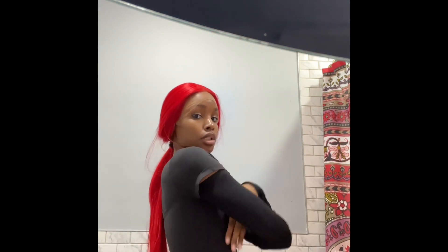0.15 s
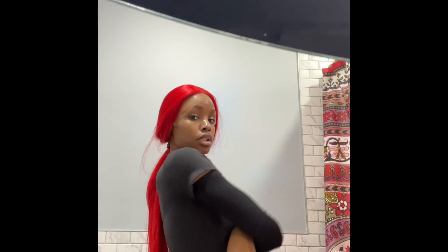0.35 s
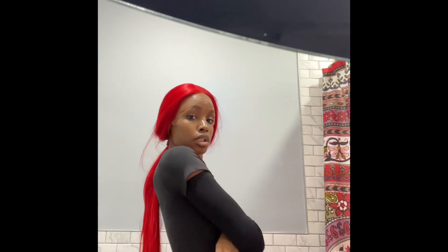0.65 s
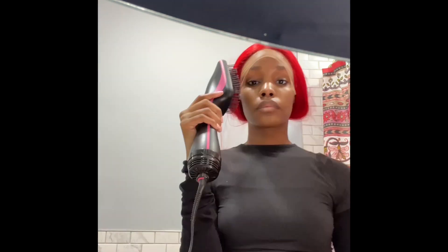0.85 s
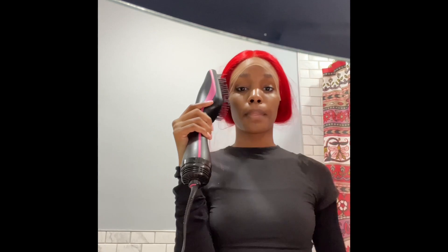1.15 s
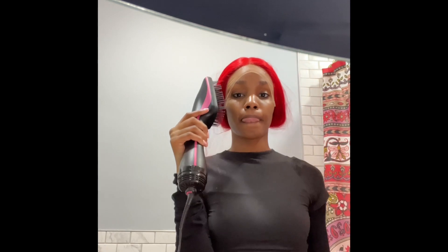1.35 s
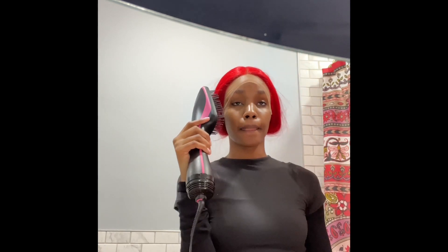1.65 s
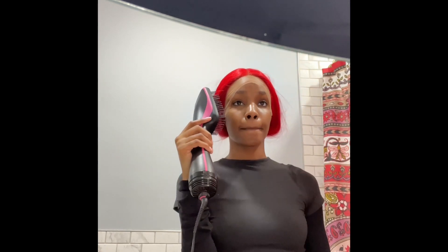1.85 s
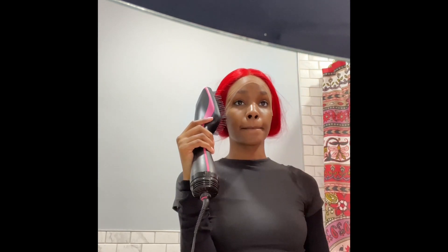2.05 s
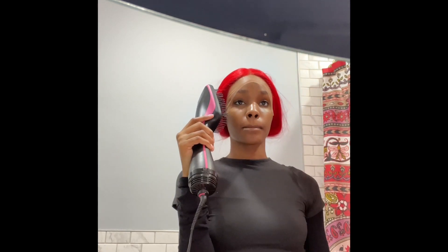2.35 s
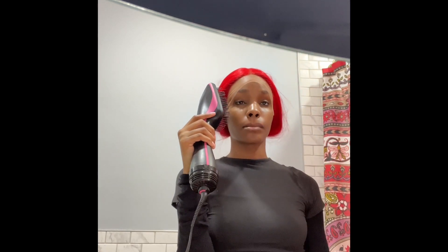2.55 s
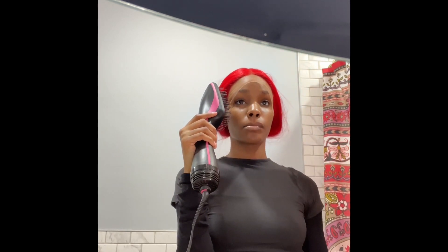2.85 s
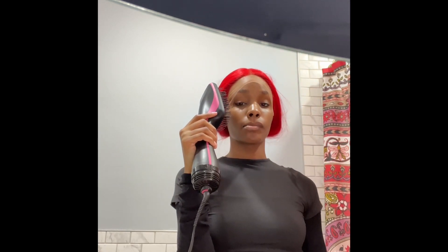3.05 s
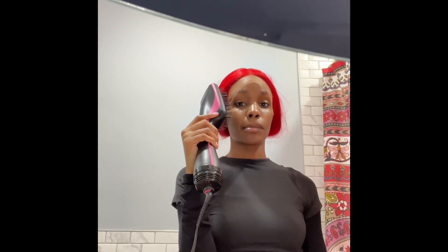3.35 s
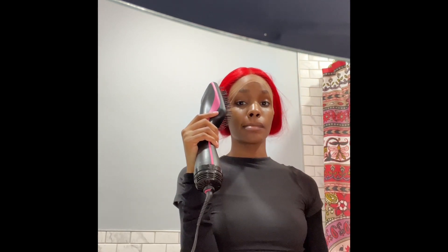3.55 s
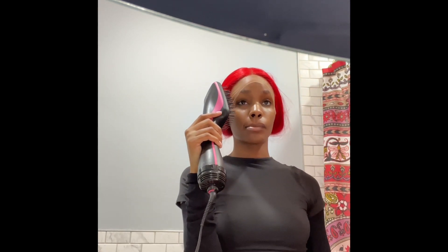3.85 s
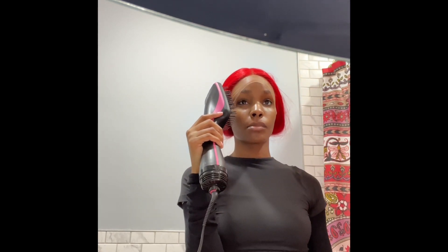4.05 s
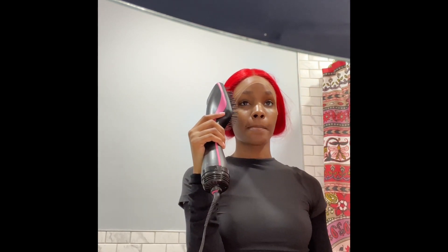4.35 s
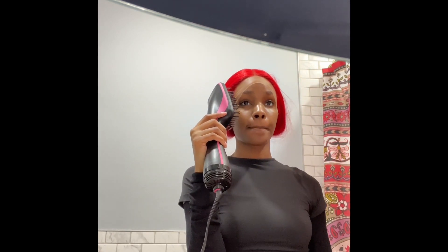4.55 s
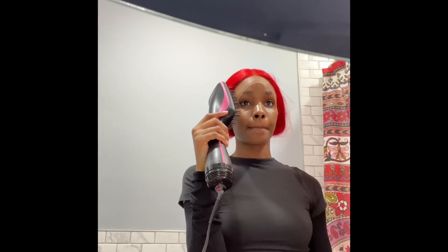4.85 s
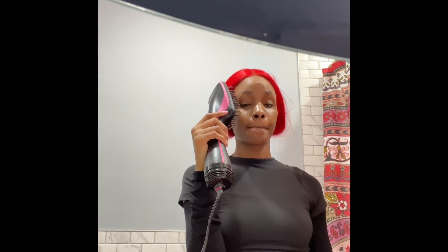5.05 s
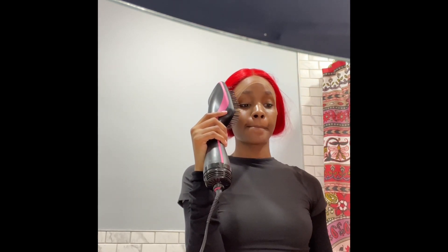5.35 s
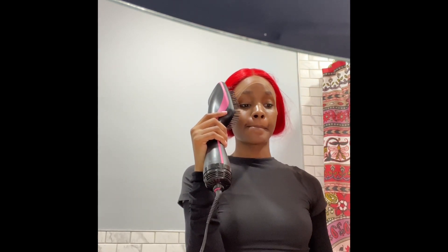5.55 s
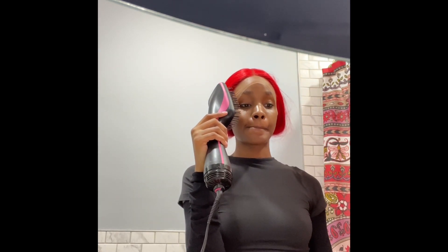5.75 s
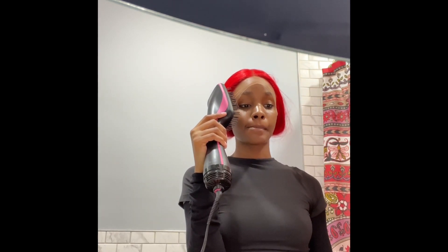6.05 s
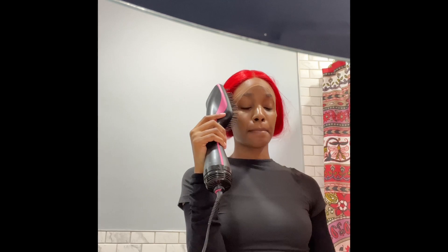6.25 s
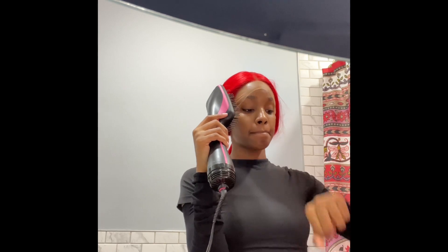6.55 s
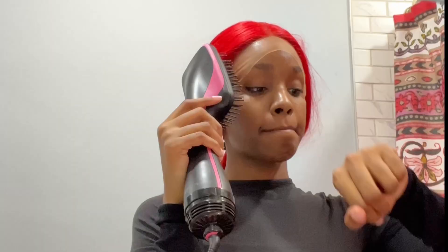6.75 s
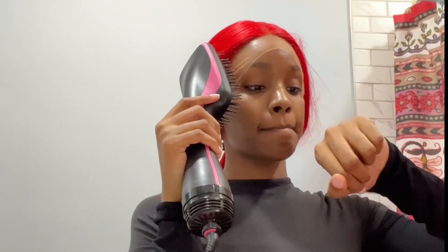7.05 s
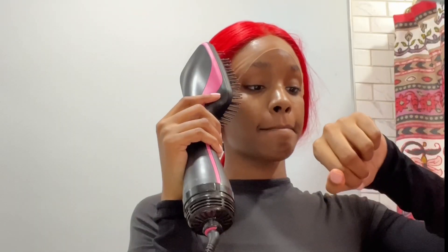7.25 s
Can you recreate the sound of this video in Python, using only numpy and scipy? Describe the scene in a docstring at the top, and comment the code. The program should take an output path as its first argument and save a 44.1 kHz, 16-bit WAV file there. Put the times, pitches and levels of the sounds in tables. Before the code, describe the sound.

Faint cloth and hair rustling in a quiet bathroom cuts abruptly to a hot air brush blowing steadily with a thin, wavering whine.

```python
"""Hot air brush on a wig

In a small tiled bathroom a sleeve and long hair rustle; a short crossfaded cut leads to the running hot air brush.
Rustles are swells of shaped noise; the air is noise shaped by resonances of brush and room, which flare up briefly.
Shaft-locked sines make the fan's hum and whine, which change as the brush is moved near two microphone ports."""
import sys
import numpy as np
from scipy import signal
from scipy.fft import rfft, irfft
from scipy.io import wavfile

SR = 44100
rng = np.random.default_rng(int(sys.argv[2]) if len(sys.argv) > 2 else 0)


def to_wav(sig):
    """Store sig (one row per channel, or 1-D mono) as 16-bit WAV at the path in sys.argv[1].

    Samples outside -1..1 are clipped; the rate is SR.
    """
    pcm = np.clip(np.atleast_2d(sig), -1, 1) * 32767
    pcm = np.round(pcm).astype(np.int16)
    wavfile.write(sys.argv[1], SR, pcm.T)  # frames by channels


N = 326781
TIME = np.arange(N) / SR


def gain_of(db):
    """Decibels to amplitude."""
    return 10 ** (np.asarray(db) / 20)


def read(points, hz):
    """A table of (frequency [Hz], value), joined on a log-frequency axis."""
    f, value = np.transpose(points)
    return np.interp(np.log(hz + 1), np.log(f + 1), value)


def follow(points, t):
    """A table of (time [s], value), joined by straight lines."""
    return np.interp(t, *np.transpose(points))


def bumps(rows, hz):
    """Sum of Gaussian peaks and dips in dB; half widths are to 1/e."""
    return sum(db * np.exp(-((hz - centre) / half) ** 2) for centre, half, db in rows)


def drift(shape, *spans):
    """Smooth chance of unit spread; each span is its grain, in cells, along one axis."""
    field = rng.standard_normal(shape)
    for axis, span in enumerate(spans):
        smooth = np.exp(-2 * (np.fft.rfftfreq(shape[axis]) * span) ** 2)
        spectrum = rfft(field.swapaxes(axis, -1)) * smooth
        field = irfft(spectrum, shape[axis]).swapaxes(axis, -1)
    return field / field.std()


def ports(hz):
    """Complex gain of the left and right port, of unit mean power."""
    # (frequency [Hz], phase by which left leads right [rad])
    lead = [(350, 0), (520, .4), (750, -.4), (1030, -.1), (1200, .3), (1300, -.2), (2450, -.15),
            (2570, -.6), (2750, -.35), (2850, .2), (3050, -.3), (3170, .45), (3500, 0), (6200, 0),
            (6350, .55), (6900, .6), (7700, 1.05), (9200, 1.7), (10750, 2.3), (11050, 2.8), (11700, np.pi)]
    # (frequency [Hz], left minus right level [dB])
    balance = [(200, -.5), (420, 0), (515, 6.5), (600, 0), (900, 0), (1030, -5), (1130, 0), (1330, 2.3),
               (1700, 3), (1900, .8), (2250, 1.4), (2550, 0), (3050, 0), (3230, -2), (3500, 0), (5000, 0),
               (6500, -.5), (9000, 0)]
    half = gain_of(read(balance, hz) / 2) * np.exp(1j * read(lead, hz) / 2)
    mean_power = (abs(half) ** 2 + abs(half) ** -2) / 2
    return np.array([half, 1 / half]) / np.sqrt(mean_power)


def noise(field_db, size):
    """Partly correlated noise at both ports whose dB per Hz follow field_db(hz column, times)."""
    # correlation of the ports: (frequency [Hz], likeness [0-1])
    likeness = [(120, .998), (300, .965), (430, .97), (520, .82), (650, .92), (740, .52), (870, .9),
                (1080, .15), (1250, .72), (1540, .88), (1700, .5), (1850, .9), (2450, .92), (2570, .62),
                (3420, .64), (3500, .99), (3750, .998), (3850, 1), (4130, 1), (4250, .996), (5050, .995),
                (5300, .96), (5550, .985), (5750, .91), (6200, .95), (6350, .73), (6900, .65), (10800, .67),
                (11050, .94), (11700, 1)]
    frames = dict(nperseg=size, noverlap=size - size // 4)
    white = rng.standard_normal((2, N)) * np.sqrt(SR / 2)  # 0 dB per Hz
    hz, t, z = signal.stft(white, SR, **frames)
    hz = hz[:, None]
    same = np.clip(read(likeness, hz), 0, 1)
    shared = np.sqrt((1 + same) / 2) * z[0]
    apart = np.sqrt((1 - same) / 2) * z[1]
    z = np.array([shared + apart, shared - apart]) * ports(hz) * gain_of(field_db(hz, t))
    return signal.istft(z, SR, **frames)[1][:, :N]


def quiet_db(hz, t, grain_db=1.0):
    """Room air plus soft, uneven swells of cloth and hair sliding."""
    # room air: (frequency [Hz], level [dB per Hz])
    room_air = [(25, -99), (60, -91), (140, -87.5), (300, -98.5), (620, -111), (1050, -106), (1500, -106.5),
                (2200, -105), (4000, -112.5), (10000, -124), (15000, -129)]
    # movements of arm, sleeve and hair, before colour and grain:
    # (time [s], half length to 1/e [s], centre [Hz], spread to 1/e [octaves], peak level [dB per Hz])
    rustles = [(.0, 0.03, 1800, 1.1, -96), (.12, .045, 2300, .4, -96), (.15, .07, 5000, .9, -102.5),
               (0.248, 0.052, 5500, 1.1, -99), (.25, .02, 1800, .6, -102), (.325, .02, 1400, 0.73, -101),
               (.39, 0.016, 2600, 1.1, -106), (.485, 0.031, 1250, 0.72, -95.5),
               (0.495, .022, 220, 0.81, -86), (0.503, 0.025, 60, 1.3, -79), (0.517, 0.04, 4500, 0.9, -110),
               (.665, 0.06, 2380, 0.35, -100.5), (.7, .06, 130, .6, -84), (.762, .014, 2250, 0.35, -95)]
    # colour the small room gives the rustling: (centre [Hz], half width [Hz], level [dB])
    rustle_colour = [(1020, 50, 4), (1250, 60, -4), (1500, 45, 4.5), (1740, 90, -3.5), (2120, 70, 4),
                     (2350, 45, 4), (2450, 40, -8), (2600, 45, 2.5), (3150, 45, 3)]
    rubbing = 0
    for s, length, centre, spread, db in rustles:
        in_time = ((t - s) / length) ** 2
        in_pitch = (np.log2((hz + 1) / centre) / spread) ** 2
        rubbing = rubbing + gain_of(db) ** 2 * np.exp(-in_time - in_pitch)
    catching = gain_of(grain_db * drift(rubbing.shape, 8, 1.5)) ** 2  # fibres catch and slip
    rustling = gain_of(bumps(rustle_colour, hz)) ** 2 * rubbing * catching / catching.mean()
    return 10 * np.log10(gain_of(read(room_air, hz)) ** 2 + rustling)


def bathroom():
    """The quiet room: shaped noise of air and rustling, plus a faint hum of steady sines."""
    # (frequency [Hz], RMS level [dB])
    room_hum = [(134, -81), (268, -81), (378, -79)]
    hum = np.zeros(N)
    for hz, db in room_hum:
        hum += np.sqrt(2) * gain_of(db) * np.sin(2 * np.pi * (hz * TIME + rng.random()))
    return noise(quiet_db, size=1024) + hum


def air_db(hz, t, ripple_db=1.0, shifting_db=2.0, swirl_waver_db=0.12, eddy_db=0.36):
    """Turbulence through resonances that trade strength as the brush tilts, rippled by tile reflections."""
    # levels here are before the trim in air()
    # broad rush of air: (frequency [Hz], level [dB per Hz])
    rush = [(25, -114), (55, -91), (330, -99), (450, -78.5), (740, -72.5), (1700, -65.5), (2100, -62.5),
            (2950, -68.5), (4200, -64.5), (5100, -70.5), (6300, -68.5), (7200, -68.5), (11000, -71),
            (13200, -80), (15700, -83)]
    # low resonances of the small room: (centre [Hz], width at -6 dB [Hz], level [dB per Hz])
    room_modes = [(118, 12, -71.5), (140, 12, -80.5), (177, 13, -75), (203, 19, -76), (234.3, 11.1, -69.5),
                  (274, 51, -75), (348, 27, -71.5), (415.3, 64, -66), (460, 11, -67)]
    # resonances of barrel and brush head, sharpened by the tiles:
    # (centre [Hz], width at -6 dB [Hz], level upright [dB per Hz], level tilted [dB per Hz])
    brush_modes = [(585, 118, -64.5, -64.5), (630.5, 13.8, -55.5, -56), (684, 30, -60.5, -62),
                   (796, 17, -58.5, -64.5), (833, 23, -58.5, -59.5), (869, 23, -59.5, -58),
                   (952, 16, -63, -68), (1000, 23, -61.5, -59.5), (1031, 22, -57, -59),
                   (1118, 40, -68, -66), (1324, 38, -64, -61.5), (1445, 74.4, -65, -63.5),
                   (1190, 18, -59.5, -61), (1240, 18, -66, -62.5), (1522, 14, -59, -64),
                   (1570, 90, -66, -65), (1655, 50, -67, -63.5), (1784, 99, -60, -68),
                   (1910, 28, -55.5, -63), (1944, 22, -56, -56), (2000, 22, -57, -58),
                   (2048, 29, -57.5, -55), (2085, 18, -64, -55), (2107, 18, -60, -51.5),
                   (2155, 24, -62, -60.5), (2231, 22, -57, -53), (2268, 26, -57, -54), (2320, 34, -53, -55),
                   (2362, 24, -60, -56), (2405, 36, -57.5, -60), (2489, 44, -53.5, -52.5),
                   (2568, 41, -54.5, -59), (2640, 52, -60, -60), (2726, 58, -54.5, -54),
                   (2778, 32, -56.5, -56), (2820, 30, -61, -64), (2858, 24, -61, -57),
                   (2893, 30, -57.5, -56), (3047, 36, -57.5, -62), (3177, 40, -58, -56.5),
                   (3285, 80, -63, -63.5), (3348, 46, -55.5, -57), (3506, 43, -65.5, -68),
                   (4120, 90, -68, -68), (4437, 95, -63.5, -61.5), (4630, 390, -68, -67.5),
                   (5480, 190, -65.5, -65.5), (5630, 130, -67.5, -69.5), (6020, 160, -70, -70),
                   (6740, 150, -70, -69)]
    # the brush tilts as it settles into the hair: (time [s], tilt [0-1])
    tilting = [(0.8, 0.2), (3.6, 0.2), (4.4, 0.45), (5.2, 0.85), (7.4, 1)]
    # narrow peaks and dips from tile reflections: (centre [Hz], half width [Hz], level [dB])
    reflections = [(784, 14, 1), (920, 12, -4.5), (1725, 20, -1.5), (2466, 15, -4), (2950, 22, 4),
                   (3410, 16, -2), (3680, 80, -1), (5770, 90, -4), (7000, 90, -4)]
    # colour of the vents before hair covers them: (centre [Hz], half width [Hz], level [dB])
    open_vents = [(645, 20, -4), (1120, 80, 3.5), (1790, 50, 0.5), (2490, 35, -2), (2765, 51, 4),
                  (3170, 40, -9), (3410, 45, 8), (3530, 50, 6), (4380, 170, 2)]
    # corners of two overlapping swirl bands: (frequency [Hz])
    swirl_hz = [1500, 1850, 2250, 2550, 2850, 3300]
    # swirl around the bristles: (time [s], level [dB])
    swirl_level = [(0.88, -0.1), (1.12, 2.5), (1.32, -0.2), (1.54, 1.5), (1.62, -2.6), (1.73, 1.5),
                   (1.87, 0), (1.97, 0.3), (2.55, -0.5), (2.88, 0.8), (3.02, -0.5), (3.25, 1), (3.5, 0.2),
                   (4.2, -0.1), (4.37, 1.5), (4.55, 0), (4.71, 2.5), (4.98, 0.5), (5.14, 1.3), (5.33, 0.5),
                   (5.55, 1.7), (5.74, -0.5), (5.85, 2.2), (6.0, 0.4), (6.6, 0.5), (6.8, 1), (7.12, 1.0),
                   (7.4, 0.5)]
    covered_s, covering_s = 1.16, 0.25  # end and length of the vents' covering

    tilt = np.clip(follow(tilting, t), 0, 1)
    modes = list(room_modes)
    for centre, width, upright, tilted in brush_modes:
        modes.append((centre, width, upright + (tilted - upright) * tilt))
    power = gain_of(read(rush, hz)) ** 2
    for centre, width, db in modes:
        power = power + (gain_of(db) / (1 + (2 * (hz - centre) / width) ** 2)) ** 2

    uncovered = np.clip((covered_s - t) / covering_s, 0, 1)
    colour = bumps(reflections, hz) + uncovered * bumps(open_vents, hz)

    low = np.interp(hz, swirl_hz[:4], [0, 1, 1, 0])
    high = np.interp(hz, swirl_hz[2:], [0, 1, 1, 0])
    # both bands follow one level, and each wavers on its own
    swirl = follow(swirl_level, t)
    strength = sum(band * (swirl + swirl_waver_db * drift(t.shape, 15)) for band in (low, high))
    # eddies at the bristles flare up in short patches
    strength = strength + (low + high) * eddy_db * drift(strength.shape, 6.0, 2.0)

    # crowded room modes: part stands still, most of all in the treble; part shifts as the hand moves
    treble = np.interp(hz, [3000, 6000], [0.6, 1])
    standing = treble * ripple_db * drift((len(hz), 1), 1.1)
    shifting = shifting_db * drift((len(hz), len(t)), 1.0, 25)
    reverberant = read([(400, 0.5), (1200, 0.88), (3000, 1.0), (6000, 0.86)], hz)
    return 10 * np.log10(power) + colour + strength + reverberant * (standing + shifting)


def air(level_db=0.09, flutter_db=0.53):
    """The air stream, fluttering slightly in the hair."""
    return noise(air_db, size=4096) * gain_of(level_db + flutter_db * drift((N,), SR / 25))


def fan(whine_db=-0.4, weak_db=-2.0, jitter_hz=0.2, scatter=0.13,
        waver_db=0.95, sway_db=0.48, weak_waver_db=2.5):
    """Shaft-locked tones: a hum, the blades' whine and weaker multiples, wavering as the hand moves."""
    # tone levels are RMS, before the trims whine_db and weak_db and the wavering
    # speed rises briefly, settles by 1.65 s, then wanders slightly: (time [s], offset from shaft_hz [Hz])
    speed = [(0.8, 0.57), (1.2, 1.55), (1.65, -0.18), (3.8, -0.15), (4.7, 0.4), (6.1, 0.052), (7.0, 0.24)]
    # multiples of the shaft speed in the hum: (order [1])
    hum_orders = (1, 3)
    # hum as the brush is brought to the hair: (time [s], shaft tone [dB], third multiple [dB])
    hum_levels = [(0.85, -46.5, -44), (1.15, -39.5, -44), (1.3, -40.5, -53), (1.52, -38, -37),
                  (1.9, -42, -41), (2.4, -39, -39), (2.7, -41.5, -36), (3.1, -41, -35), (3.75, -41, -38),
                  (4.3, -41, -36.5), (4.83, -44, -39), (5.1, -43, -36), (5.7, -43.5, -35),
                  (6.55, -43.5, -38), (6.85, -42.5, -38), (7.4, -42.5, -40.5)]
    # whine, beamed past the microphone as the brush turns: (time [s], blade tone [dB], its octave [dB])
    whine_levels = [(0.82, -37, -48), (0.98, -36.5, -51), (1.12, -45, -60), (1.23, -31, -45),
                    (1.38, -33, -41), (1.5, -33, -48), (1.7, -31, -60), (2.2, -30.5, -55), (3.2, -31, -49),
                    (3.35, -33.5, -52), (3.7, -31.5, -52), (4.25, -33.5, -50), (4.92, -34, -53),
                    (5.1, -35, -57), (5.82, -33.5, -47), (5.92, -38, -46), (6.08, -39, -40),
                    (6.22, -42, -48), (6.4, -37.5, -49), (6.8, -53, -53), (7.35, -38, -40)]
    # weaker tones: (multiple of the shaft speed [1], level [dB])
    weak_orders = [(2, -62), (5, -48), (8, -43.5), (11, -45.5), (13, -68), (15, -59), (18, -54), (19, -70),
                   (20, -62), (21, -45.5), (28, -61)]
    shaft_hz, blades = 514.7, 7
    slow_t = np.linspace(0, N / SR, num=1024)

    def wander(span):
        """Slow chance over the whole time."""
        return np.interp(TIME, slow_t, drift(slow_t.shape, span))

    turn_hz = shaft_hz + follow(speed, TIME) + jitter_hz * wander(3.5)
    angle = 2 * np.pi * np.cumsum(turn_hz) / SR
    hum_s, *hum_db = np.transpose(hum_levels)
    whine_s, blade, octave = np.transpose(whine_levels)
    strong = []
    for k, db in zip(hum_orders, hum_db):
        strong.append((k, np.interp(TIME, hum_s, db) + sway_db * wander(22)))
    for k, db in ((1, blade), (2, octave)):
        strong.append((k * blades, whine_db + np.interp(TIME, whine_s, db)))
    tones = [(k, db + waver_db * wander(5.2)) for k, db in strong]
    tones += [(round(k), weak_db + db + weak_waver_db * wander(69)) for k, db in weak_orders]

    out = np.zeros((2, N))
    for k, db in tones:
        tone = np.sqrt(2) * gain_of(db) * np.exp(1j * k * angle + 2j * np.pi * rng.random())
        tone = tone * (1 + scatter * (wander(2.1) + 1j * wander(3.8)))  # turbulence roughens each tone
        out += (ports(k * shaft_hz)[:, None] * tone).real
    return out


def resonance_flares(half_length_s=0.091, wobble_hz=3):
    """A resonance flares up briefly: a thin wobbling tone in a Gaussian swell."""
    # (time [s], frequency [Hz], RMS level at the peak [dB])
    flares = [(0.9, 3420, -42), (1.12, 2760, -38), (1.85, 2315, -38), (5.52, 2228, -37),
              (6.87, 3348, -37.5)]
    out = np.zeros((2, N))
    for s, hz, db in flares:
        turn = np.exp(2j * np.pi * np.cumsum(hz + wobble_hz * drift((N,), SR / 40)) / SR)
        swell = np.sqrt(2) * gain_of(db) * np.exp(-((TIME - s) / half_length_s) ** 2)
        out += (ports(hz)[:, None] * turn).real * swell
    return out


def scene(dip_db=-14):
    """A short crossfaded cut from the quiet room to the running blower, with a brief dip in level."""
    cut_s, fade_s, dip_half_s = 0.7866, 0.038, 0.0084
    fade_in = np.clip((TIME - cut_s) / fade_s, 0, 1)
    dip = gain_of(dip_db * np.exp(-((TIME - cut_s) / dip_half_s) ** 2))
    # the room stays on beneath the blower
    return dip * bathroom() + fade_in * (air() + fan() + resonance_flares())


def record(dry):
    """The recorder's band limit: a steep linear-phase low-pass."""
    edge_hz = 15800
    lowpass = signal.firwin(1023, edge_hz, window=("kaiser", 9), fs=SR)
    return signal.oaconvolve(dry, lowpass[None], "same")


dry = scene()
out = record(dry)
to_wav(out)
```